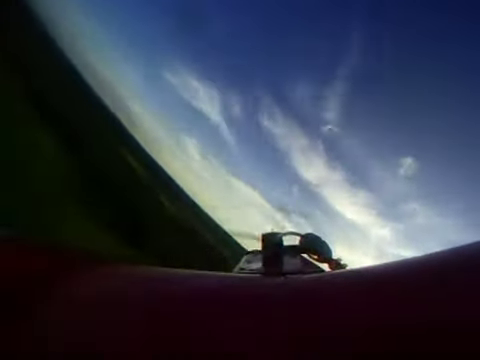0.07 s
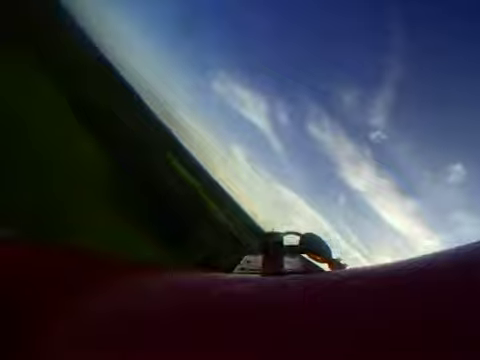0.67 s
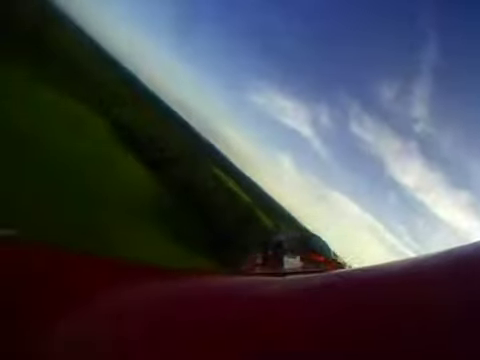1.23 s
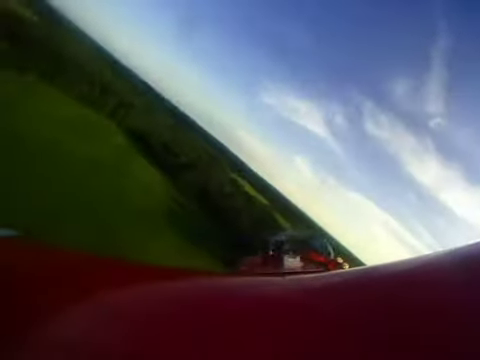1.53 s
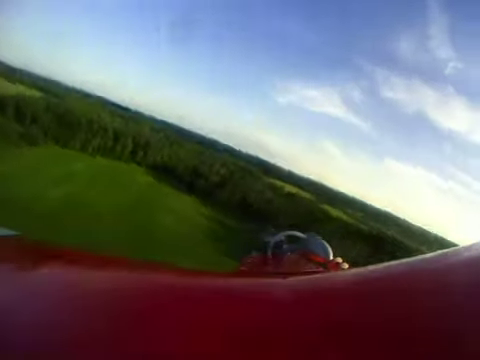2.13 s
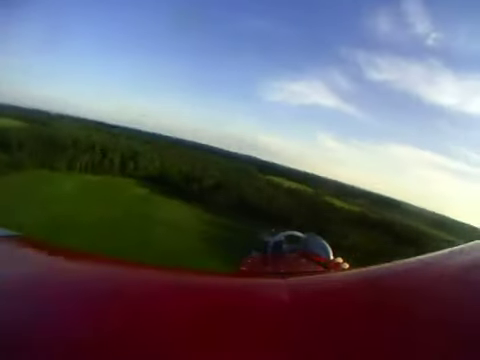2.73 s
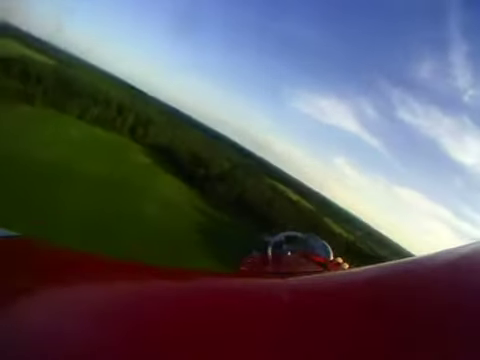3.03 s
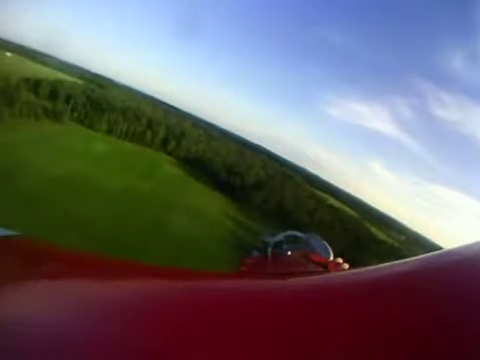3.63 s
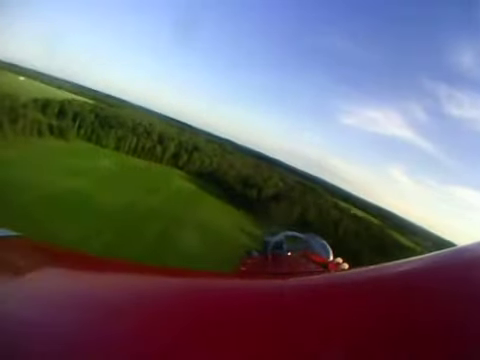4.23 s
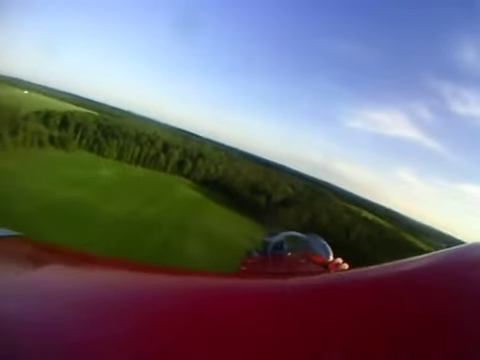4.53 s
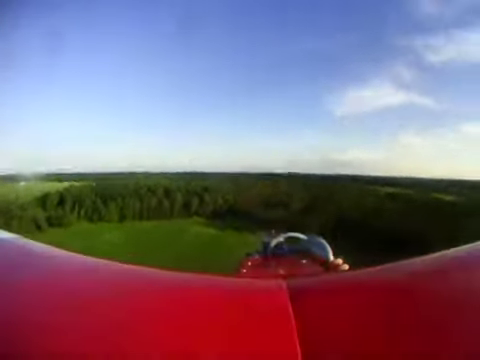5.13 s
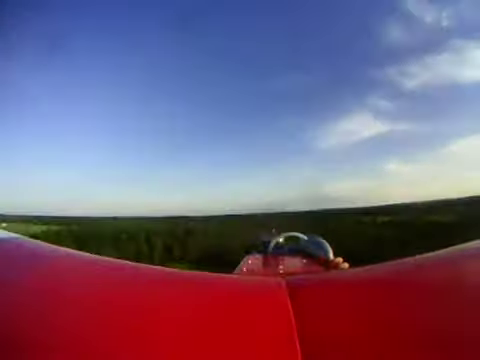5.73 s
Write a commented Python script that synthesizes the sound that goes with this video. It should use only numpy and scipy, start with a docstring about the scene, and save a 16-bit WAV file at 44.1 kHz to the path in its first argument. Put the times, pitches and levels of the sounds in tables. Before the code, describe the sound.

A small model airplane engine burbles close up in flight with loose knocks, then revs up into a loud, crackling growl.

```python
"""A model airplane's single-cylinder engine burbles at low throttle, close up, with loose knocks.
Each revolution fires a pulse down the muffler, cracks the exhaust port open and puffs out rough gas.
The engine revs up until, near top speed, every other firing is the stronger one and it growls.
Underneath, the slipstream shakes the wing and drums on the fuselage.
The loudest peaks overload a narrow-band microphone on the airframe, with a sharp crackle at top speed."""
import sys
import numpy as np
from scipy import signal
from scipy.fft import rfft, irfft, next_fast_len
from scipy.io import wavfile
from scipy.ndimage import map_coordinates

SR = 44100
rng = np.random.default_rng(int(sys.argv[2]) if len(sys.argv) > 2 else 0)


def file_out(sig):
    """Save sig as 16-bit WAV at sys.argv[1]."""
    # one column per channel
    cols = np.atleast_2d(sig).T
    # limit, then scale
    lim = np.clip(cols, -1, 1)
    pcm = np.round(lim * 32767).astype(np.int16)
    wavfile.write(sys.argv[1], SR, pcm)


N = 255339

# the crankshaft's run from idle to full revs: (time [s], speed [Hz])
SHAFT_SPEED = [(0.0, 146.5), (0.26, 142.3), (0.42, 147.7), (0.56, 144.8), (0.76, 147.8), (0.89, 143.1),
               (1.23, 148.4), (1.32, 145.2), (1.47, 148), (1.51, 143.3), (2.19, 147.2), (2.34, 145.1),
               (2.63, 150), (2.84, 149.8), (2.93, 144.5), (3.05, 148.8), (3.3, 145.5), (3.53, 151.2),
               (3.59, 157.9), (3.68, 153.2), (4.01, 167.8), (4.08, 165.2), (4.24, 173.3), (4.29, 169.6),
               (4.45, 181.1), (4.81, 185.8), (5.21, 198.5), (5.79, 202.4)]
# the exhaust note at five throttle settings: (order [x shaft speed], level [dB])
NOTE_IDLE = [(2, -8.5), (3, -9), (4, -22), (5, -18), (6, -14), (7, -14.5), (8, -14), (9, -29.5), (10, -13),
             (11, -7.5), (12, -5), (13, -21), (14, -11), (15, -15), (16, -20)]
NOTE_PART = [(2, -13.5), (3, -12.5), (4, -10), (5, -12.5), (6, -9.5), (7, -18), (8, -15.5), (9, -5.5),
             (10, -8.5), (11, -11.5), (12, -14), (13, -15.5), (14, -21), (15, -25), (16, -24.5)]
NOTE_HALF = [(2, -20.5), (3, -13), (4, -35.5), (5, -13.5), (6, -18.5), (7, -20), (8, -10), (9, -4),
             (10, -6), (11, -7.5), (12, -10), (13, -21.5), (14, -19), (15, -25), (16, -28)]
NOTE_CLIMB = [(2, -21), (3, -10), (4, -16.5), (5, -17), (6, -21), (7, -21.5), (8, -9.5), (9, 0), (10, -18),
              (11, -10), (12, -14), (13, -23), (14, -23.5), (15, -20.5), (16, -24)]
NOTE_FULL = [(2, -21.5), (3, -12.5), (4, -9.5), (5, -15), (6, -17), (7, -5.5), (8, -8.5), (9, -4),
             (10, -13), (11, -17), (12, -21.5), (13, -26.5), (14, -26), (15, -20.5), (16, -26)]
# where each of those five settings sits: (shaft speed [Hz])
NOTE_SPEEDS = [148, 170, 183, 193.5, 201.3]
# the airframe's answer to the once-a-revolution shake, with a null midway: (shaft speed [Hz], level [dB])
AIRFRAME_THRUM = [(142, -28), (149, -31.5), (160, -22.5), (170, -22.5), (183, -33), (189, -31), (198, -20),
                  (203, -21)]
# tone of the exhaust port's crack: (frequency [Hz], gain [dB])
PORT_EQ = [(1500, -58.5), (2100, -38), (2450, 8.5), (2800, -3), (3050, 14.5), (3400, 3), (3750, -17),
           (4600, -21.5)]
# the cowl's resonances colouring gas and clatter at three throttle settings: (frequency [Hz], gain [dB])
COWL_IDLE_EQ = [(100, -20.5), (220, -15), (560, -15.5), (950, -4.5), (1290, -19.5), (1420, -6.5),
                (1810, -1), (1890, -9.5), (2020, -5.5), (2840, -16), (3010, -13.5), (3490, -19.5),
                (3660, -27), (4600, -40.5)]
COWL_OPEN_EQ = [(100, -13.5), (220, -26), (520, -14.5), (900, -7), (1290, -13), (1380, -2), (1810, 2.5),
                (1890, -11.5), (2280, -1), (2580, -11.5), (3010, -14), (3450, -14.5), (3660, -23),
                (4600, -31.5)]
COWL_FULL_EQ = [(100, -21), (220, -14), (340, -6), (600, -11), (780, -4.5), (1290, -6.5), (1550, 6.5),
                (1770, -9.5), (1890, -8), (2240, 2.5), (2630, -4.5), (2970, -4), (3660, -10), (4600, -36.5)]
# hard knocks at low throttle: (time [s], peak level [dB])
HARD_KNOCKS = [(0.5771, -16), (1.1134, -13), (1.3029, -15), (1.6651, -15), (1.9694, -14), (2.2039, -16),
               (2.3136, -16), (2.3825, -15), (3.1867, -14), (3.2136, -14), (3.2889, -17), (3.4655, -11),
               (3.6995, -14), (3.7179, -10)]
# the engine mount's ringing modes: (frequency [Hz], level [dB], 60 dB decay time [s])
MOUNT_MODES = [(960, -20, .01), (1699, 5.5, 0.019), (1990, -1.5, 0.027), (3230, -17.5, 0.012)]
# half orders from strong and weak firings in turn: (order [x shaft speed], level [dB])
GROWL_ORDERS = [(0.5, -3), (1.5, -8), (2.5, -16), (3.5, -11), (4.5, -15), (5.5, -19), (6.5, -21), (7.5, -9),
                (8.5, -10), (9.5, -15)]
# tone of the microphone's overload crackle: (frequency [Hz], gain [dB])
CRACKLE_EQ = [(300, -20.5), (1200, -9.5), (2500, -9.5), (3400, 5.5), (4200, 3), (5000, -3.5), (7000, -38.5)]
# gusts that shake the wing: (start [s], length [s], shudder level [dB])
WING_GUSTS = [(0.045, .42, -38.5), (1.602, .35, -41), (2.28, 0.17, -38.5), (3.586, .42, -32),
              (4.796, 0.12, -32), (5.323, 0.4, -28)]
# tone of the wing's shudder and of the fuselage's drumming: (frequency [Hz], gain [dB])
WING_EQ = [(12, -30), (24, -20), (30, -13.5), (34, 0.5), (38, -8.5), (56, -27), (120, -62.5)]
FUSELAGE_EQ = [(35, -19), (58, -16.5), (74, 0.5), (95, -9), (116, -6), (145, -13), (220, -23.5), (500, -44)]
# the microphone's narrow passband: (frequency [Hz], gain [dB])
MICROPHONE_EQ = [(10, 1.5), (25, -0.5), (3600, -2), (4000, -4), (4250, -11.5), (4500, -23.5), (4750, -64.5),
                 (5200, -110)]

IDLE_HZ, OPEN_HZ = 149.7, 194.6  # shaft speed with the throttle closed and wide open


def exhaust(turns, speed, note_db):
    """One firing per revolution; the muffler favours different orders as the revs climb."""
    weights = shares(speed, NOTE_SPEEDS)
    idling = weights[0]
    # at low throttle the charge burns less evenly in timing and strength: the burble
    jitter_turns = .0011 * (1 + idling)
    scatter_db = 1 + idling
    firing = turns + jitter_turns * per_cycle(turns)
    strength = amp(scatter_db * per_cycle(turns))
    note = np.zeros(N)
    for rows in zip(NOTE_IDLE, NOTE_PART, NOTE_HALF, NOTE_CLIMB, NOTE_FULL):
        order = rows[0][0]
        level = sum(w * amp(db) for w, (_, db) in zip(weights, rows))
        flicker = amp(wobble(6))
        pipe_lag = .15 * rng.standard_normal()  # the pipe delays each order differently, smearing the pulse
        note += level * flicker * np.cos(2 * np.pi * (order * firing + pipe_lag))
    push_db = 1.2 * (1 - idling)
    return amp(note_db + push_db) * unit(note * strength)


def mount_whine(speed, resonance_hz=1719.6, width_hz=22, peak_db=1.5):
    """Lift in dB as the nearest shaft order sweeps through the mount's main resonance."""
    detune = speed * np.round(resonance_hz / speed) - resonance_hz
    return peak_db / (1 + (detune / width_hz) ** 2)


def thrum(turns, speed):
    """The engine shakes the airframe once a revolution: a low, fluttering hum."""
    level_db = np.interp(speed, *np.transpose(AIRFRAME_THRUM))
    shake = np.sin(2 * np.pi * turns) * amp(.7 * wobble(14))
    return amp(level_db) * unit(shake)


def port_cracks(turns, speed, note_db):
    """The exhaust port bursts open once a revolution, putting a hard edge on the note."""
    edge_db = np.interp(speed, [150, 180, 192, 202], [-19, -16, -13.5, -17])
    return amp(note_db + edge_db) * cracks(turns, PORT_EQ, scatter_db=2)


def rasp(turns, speed, fade_db=10, scatter_db=1.34, push_db=5.5):
    """Each firing lets out a puff of rough gas and clatter, brighter with more throttle."""
    firing = turns + .15
    # a puff starts abruptly and fades over the revolution
    puffs = amp(-fade_db * (firing % 1) + scatter_db * per_cycle(np.floor(firing)))
    gas = np.zeros(N)
    for weight, eq in zip(shares(speed, [150, 175, 200]), (COWL_IDLE_EQ, COWL_OPEN_EQ, COWL_FULL_EQ)):
        gas += np.sqrt(weight) * unit(coloured(puffs * rng.standard_normal(N), eq))
    level_db = swell(speed, idle_db=-28.1, top_db=-21.6, top_hz=159) + push_db * throttle(speed)
    return amp(level_db) * gas


def knocks(turns, speed, attack_s=.0003, jitter_turns=.1, tap_db=-29, scatter_db=4):
    """At low throttle each revolution taps the engine mount lightly, and a few knock hard."""
    t = np.arange(SR // 25) / SR
    ring = sum(amp(db - 60 * t / t60) * np.sin(2 * np.pi * hz * t) for hz, db, t60 in MOUNT_MODES)
    ring *= 1 - np.exp(-t / attack_s)
    taps = cycle_starts(turns + jitter_turns * per_cycle(turns))
    blows = np.zeros(N)
    blows[taps] = amp(tap_db + scatter_db * np.minimum(rng.standard_normal(len(taps)), 2))
    blows *= np.interp(speed, [160, 180], [1, 0])  # the taps fade as the revs climb
    for time_s, db in HARD_KNOCKS:
        blows[round(time_s * SR)] = amp(db)
    return signal.fftconvolve(blows, ring / np.abs(ring).max())[:N]


def unevenness(speed, start_s=5.18, attack_s=.066, jump_db=26.5):
    """Level in dB of the alternate firing: a trace that grows with the revs, then jumps at start_s."""
    set_in = np.clip((np.arange(N) / SR - start_s) / attack_s, 0, 1)
    return swell(speed, idle_db=-70, top_db=-46, top_hz=OPEN_HZ) + jump_db * set_in


def growl(turns, uneven_db, drift_db=.5):
    """Strong and weak firings alternate, adding a growl an octave below the note."""
    tone = np.zeros(N)
    for order, db in GROWL_ORDERS:
        level = amp(db + drift_db * wobble(11))
        tone += level * np.cos(2 * np.pi * (order * turns + rng.random()))
    return amp(uneven_db) * unit(tone)


def overload_crackle(turns, uneven_db, trim_db=-6, jitter_cycles=.016):
    """Sharp crackle every second revolution: the sound of the loudest peaks overdriving the microphone."""
    cycles = turns / 2 + jitter_cycles * per_cycle(turns / 2)
    return amp(uneven_db + trim_db) * cracks(cycles, CRACKLE_EQ, scatter_db=5.5)


def slipstream(speed, calm_db=-47, push_db=7.5, attack_s=.06, release_s=.14, drum_db=-3.5):
    """Turbulent air shakes the wing and drums on the fuselage, harder in gusts and at higher revs."""
    t = np.arange(N) / SR
    shudder = unit(coloured(rng.standard_normal(N), WING_EQ))
    drumming = unit(coloured(rng.standard_normal(N), FUSELAGE_EQ))
    air = amp(calm_db + push_db * throttle(speed) + wobble(3.6))
    for start_s, length_s, db in WING_GUSTS:
        gust = np.interp(t - start_s, [-attack_s, 0, length_s, length_s + release_s], [0, 1, 1, 0])
        air = np.maximum(air, amp(db) * gust)
    prop_wash = amp(swell(speed, idle_db=-42.5, top_db=-34.5, top_hz=158))
    buffet = np.hypot(prop_wash, amp(drum_db) * air) * amp(.5 * wobble(8))
    return air * shudder + buffet * drumming


def cracks(cycles, eq, scatter_db, jitter_s=.00002):
    """One sharp crack per cycle, each a little off in time and strength."""
    starts = cycle_starts(cycles)
    size, late = rng.standard_normal((len(starts), 2)).T
    hits = np.clip(starts + (jitter_s * SR * late).astype(int), 0, N - 1)
    blows = np.zeros(N)
    blows[hits] = amp(scatter_db * size)
    return unit(coloured(blows, eq))


def cycle_starts(cycles):
    """The samples at which a new cycle begins."""
    return np.flatnonzero(np.diff(np.floor(cycles)))


def throttle(speed, top_hz=OPEN_HZ):
    """0 at idle, rising to 1 at shaft speed top_hz."""
    return np.clip((speed - IDLE_HZ) / (top_hz - IDLE_HZ), 0, 1)


def swell(speed, idle_db, top_db, top_hz):
    """A fader in dB that rides up with shaft speed and levels off at top_hz."""
    return idle_db + (top_db - idle_db) * throttle(speed, top_hz)


def shares(speed, settings_hz):
    """Cross-fade weights of the throttle settings at each moment."""
    return [np.interp(speed, settings_hz, row) for row in np.eye(len(settings_hz))]


def per_cycle(cycles):
    """A new random value for each cycle, joined smoothly."""
    return map_coordinates(rng.standard_normal(2048), [cycles + 1], mode="nearest")


def wobble(rate):
    """A smooth random curve, rate knots a second."""
    knots = rng.standard_normal(int(N * rate / SR) + 4)
    return map_coordinates(knots, [np.arange(N) * rate / SR])


def coloured(x, eq):
    """x through a minimum-phase EQ drawn as (frequency [Hz], gain [dB]) points."""
    size = 2 * next_fast_len(N // 2 + 8192)
    hz, db = np.transpose(eq)
    gain = amp(np.interp(np.log(np.fft.rfftfreq(size, 1 / SR) + 1), np.log(hz), db))
    cepstrum = irfft(np.log(gain + 1e-6))
    # folding the cepstrum puts all the ringing after the hit
    cepstrum[1:size // 2] *= 2
    cepstrum[size // 2 + 1:] = 0
    return irfft(rfft(x, size) * np.exp(rfft(cepstrum)))[:N]


def band_limited(x, gain):
    """x through a linear-phase filter; gain is a function of frequency."""
    size = next_fast_len(N + 8192)
    return irfft(rfft(x, size) * gain(np.fft.rfftfreq(size, 1 / SR)), size)[:N]


def amp(db):
    """Decibels to gain."""
    return 10 ** (np.asarray(db) / 20)


def unit(x):
    """Scale to rms 1."""
    return x / np.sqrt(np.mean(x ** 2) + 1e-20)


def scene():
    """The crankshaft's speed drives every layer of the mix; open air gives no echo."""
    speed = np.interp(np.arange(N) / SR, *np.transpose(SHAFT_SPEED))
    turns = np.cumsum(speed) / SR
    note_db = swell(speed, idle_db=-31, top_db=-14.5, top_hz=185.3) + mount_whine(speed)
    uneven_db = unevenness(speed)
    body = exhaust(turns, speed, note_db) + thrum(turns, speed)
    bite = port_cracks(turns, speed, note_db) + rasp(turns, speed)
    roughness = knocks(turns, speed) + growl(turns, uneven_db) + overload_crackle(turns, uneven_db)
    return (body + bite + roughness + slipstream(speed))[None]


def record(dry, overload=.78, ceiling=.71, top_hz=15800):
    """The microphone squashes loud peaks and passes only a narrow band; the highest peaks then clip."""
    squashed = dry[0] / (1 + np.abs(dry[0] / overload) ** 12) ** (1 / 12)
    narrow = band_limited(squashed, lambda hz: amp(np.interp(hz, *np.transpose(MICROPHONE_EQ))))
    clipped = np.clip(narrow, -ceiling, ceiling)
    return band_limited(clipped, lambda hz: hz < top_hz)[None]


dry = scene()
out = record(dry)
file_out(out)
```